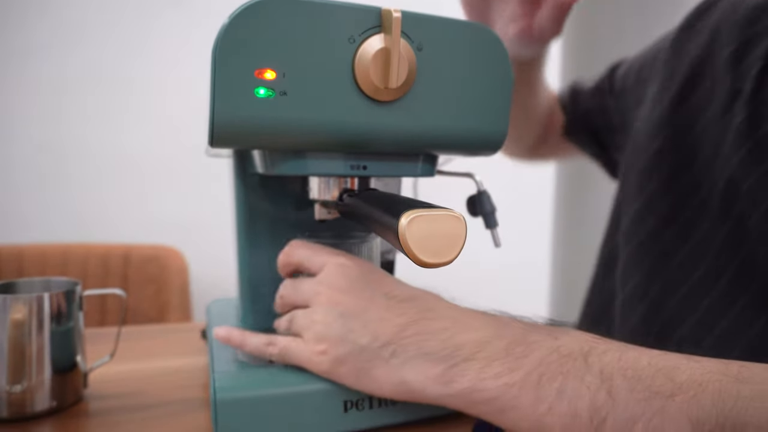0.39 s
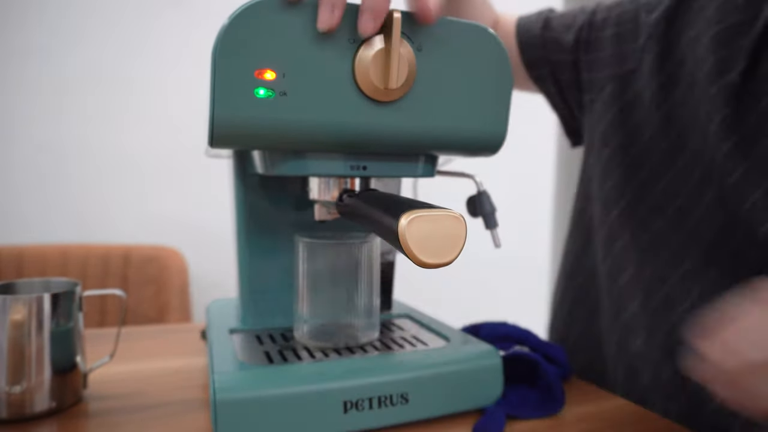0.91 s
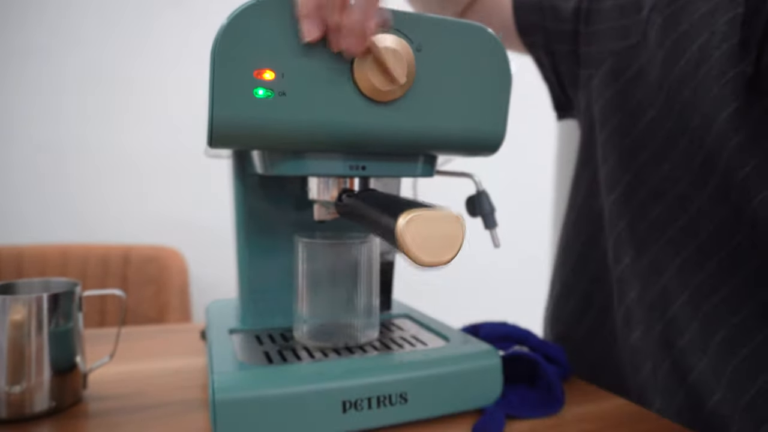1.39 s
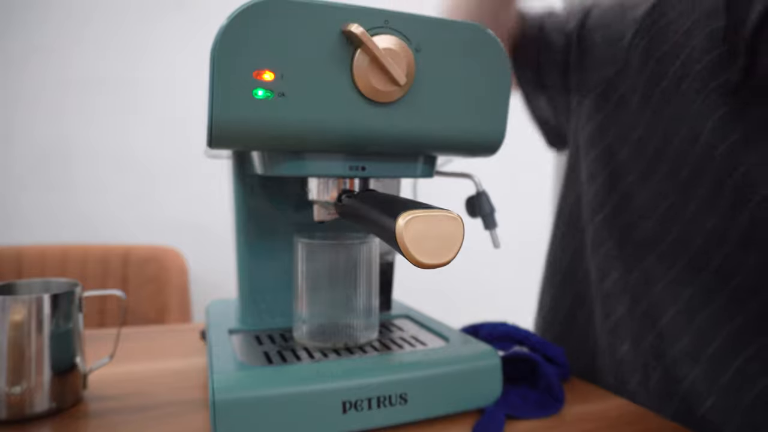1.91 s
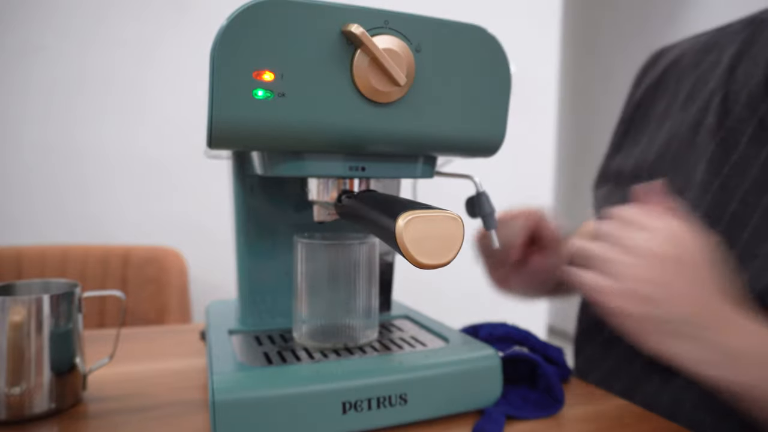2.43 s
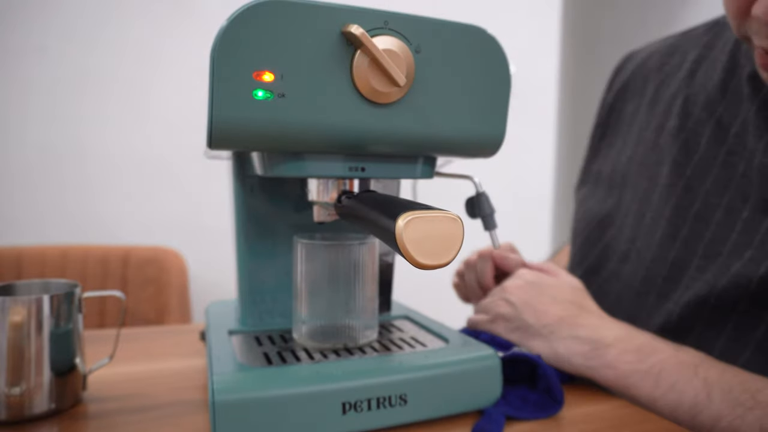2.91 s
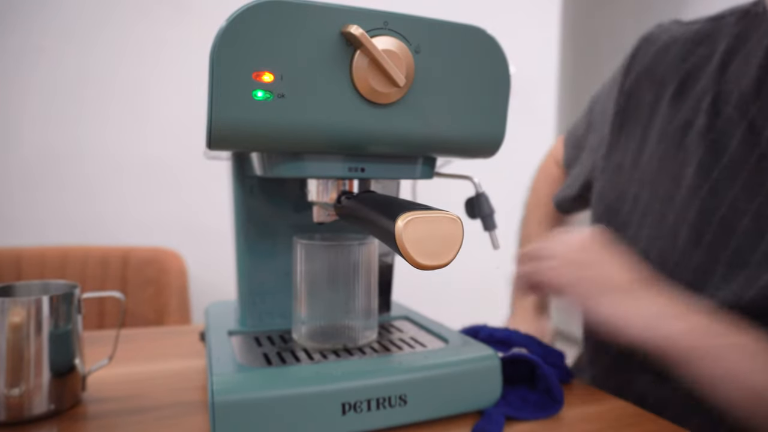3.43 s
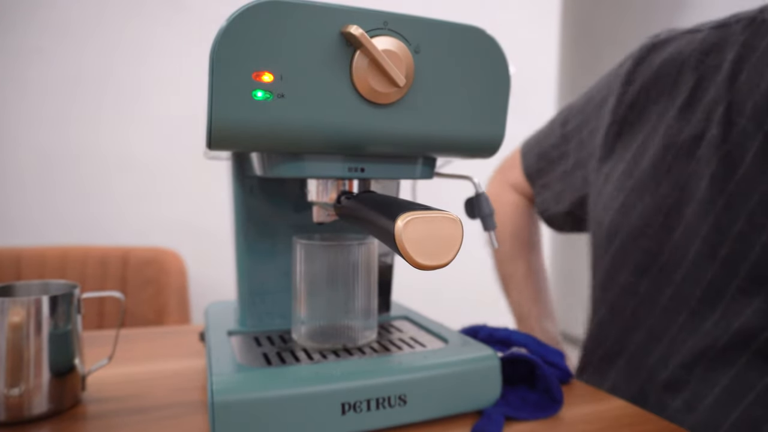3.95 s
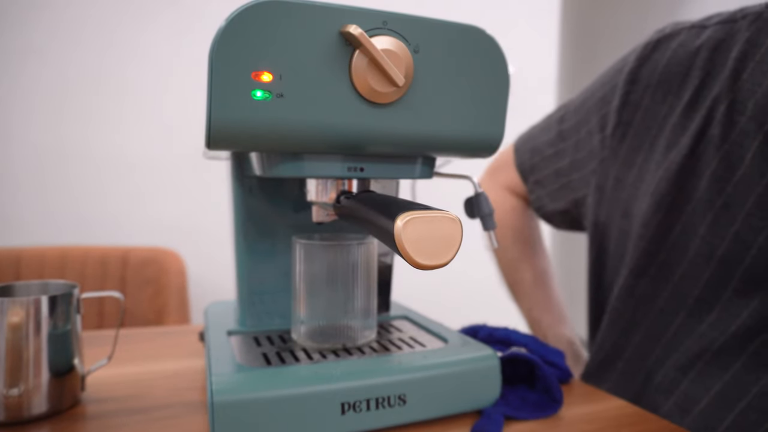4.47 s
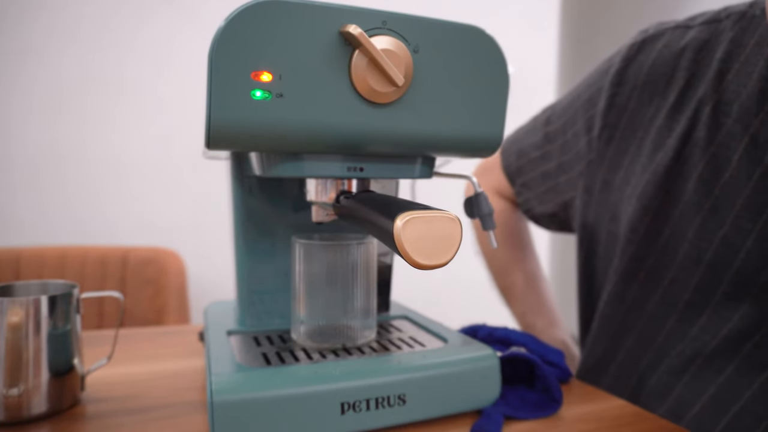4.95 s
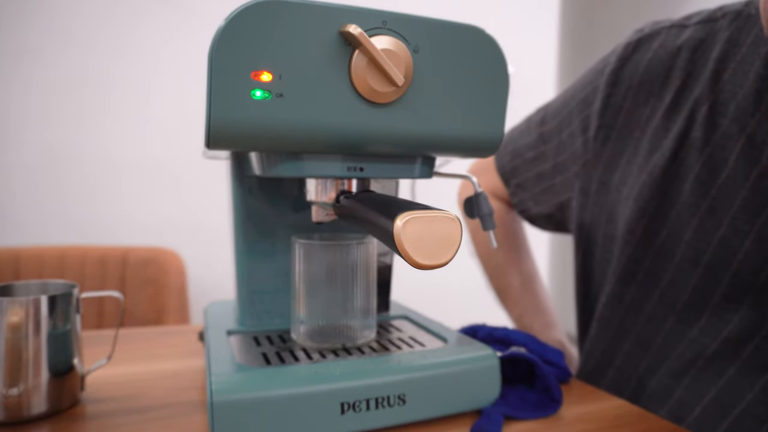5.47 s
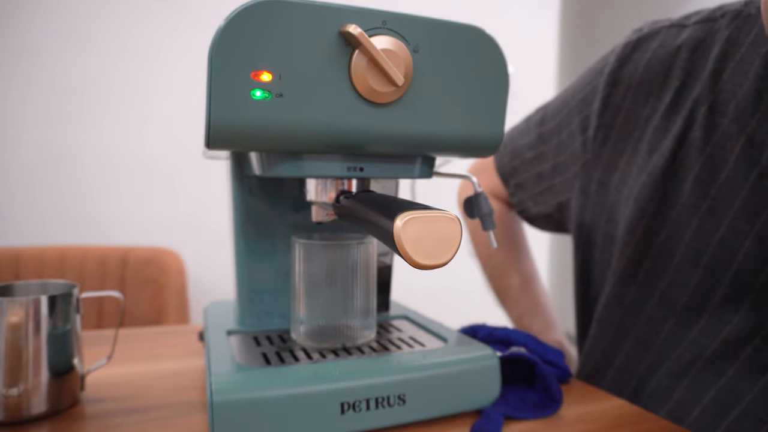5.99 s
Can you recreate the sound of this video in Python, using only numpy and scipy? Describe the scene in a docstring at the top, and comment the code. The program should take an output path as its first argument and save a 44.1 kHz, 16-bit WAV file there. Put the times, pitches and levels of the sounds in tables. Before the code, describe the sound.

Soft room noise, short glassy scrapes and a few knocks open the scene, followed by a near pause and faint rubbing. A heavy, woody switch clunk lands, and a small espresso machine's pump bursts into a coarse, steady buzz. Its casing chatters and sizzles, swelling unevenly, with thin high jingling early on and a raspier edge later. Close microphone, small room with a short dull tail, buzz continuing to the cut.

```python
"""A quiet kitchen, with a small espresso machine on a wooden table that booms under some of the knocks.
A hand slides a glass into place on the drip tray, then snaps the dial round: rubbed noise and struck modes.
Then the mains-driven plunger pump starts: a buzz of partials locked to the mains, a clack on every stroke
and noise for the rattling casing. A loose part jingles as ringing noise bands; two brief squeaks are
rising rough tones. Knocks and rubs carry a dull room tail."""
import sys
import numpy as np
from scipy import signal
from scipy.fft import rfft, irfft
from scipy.io import wavfile
from scipy.ndimage import uniform_filter1d

SR = 44100
rng = np.random.default_rng(int(sys.argv[2]) if len(sys.argv) > 2 else 0)


def store_wav(level_fs):
    """Save 16-bit WAV to argv[1]."""
    pcm = np.round(np.clip(np.atleast_2d(level_fs), -1, 1) * 32767)
    wavfile.write(sys.argv[1], SR, pcm.T.astype(np.int16))


def invert_db(x):
    """Field ratio 10**(x/20) for x, a level in decibels (scalar or array-like)."""
    u = np.asarray(x, float) / 20
    return 10 ** u


N = 269451
TIME = np.arange(N) / SR  # s
MAINS_HZ, FIRST_STROKE_S = 50.027, 1.5006  # one pump stroke per mains cycle


def level(x, db):
    """Scale to an rms level in dB."""
    return x * invert_db(db) / np.sqrt(np.mean(x ** 2))


def colour(x, points):
    """Filter by a (Hz, dB) spectrum, causal through the cepstrum."""
    hz, db = np.transpose(points)
    grid = np.maximum(np.arange(2049) * SR / 4096, 1)
    log_gain = np.interp(np.log(grid), np.log(hz), db) * np.log(10) / 20
    cepstrum = irfft(log_gain)
    # fold the second half onto the first, so that the filter never sounds ahead of its input
    cepstrum[1:2048] *= 2
    cepstrum[2049:] = 0
    return signal.fftconvolve(x, irfft(np.exp(rfft(cepstrum))))[:N]


def band(x, hz, width):
    """One resonance, gain 1 at its centre."""
    return signal.lfilter(*signal.iirpeak(hz, hz / width, SR), x)


def double_band(x, hz, width):
    """The same resonance twice over, for steeper skirts."""
    return band(band(x, hz, width), hz, width)


def walk(rate):
    """Random levels held 1 / rate s and slewed twice; spread near 1."""
    hold = int(SR / rate)
    steps = np.repeat(rng.standard_normal(N // hold + 1), hold)
    return 1.2 * uniform_filter1d(uniform_filter1d(steps, hold), hold)[:N]


def settle(steady, start, settle_s):
    """A value that starts off by `start` at the first stroke and eases to `steady`."""
    return steady + start * np.exp(-np.maximum(TIME - FIRST_STROKE_S, 0) / settle_s)


def swells(table):
    """Bell-shaped rises in dB."""
    return sum(db * np.exp(-((TIME - s) / half_s) ** 2) for s, half_s, db in table)


def spells(table, edge_s):
    """Gain of spells that glide from a start to an end level, with soft edges."""
    gain = 0
    for t0, t1, db0, db1 in table:
        edges = np.clip(np.minimum(TIME - t0, t1 - TIME) / edge_s + .5, 0, 1) ** 2
        gain = gain + invert_db(np.interp(TIME, [t0, t1], [db0, db1])) * edges
    return gain


# Colour of the room noise in the quiet kitchen. Each row: frequency in Hz, relative density in dB per Hz.
AIR_COLOUR = [(44, -33), (75, -4.5), (149, -11.5), (183, -0.5), (209, -6), (348, -8), (389, -4),
              (416, -10.5), (664, -8.5), (811, -10), (1110, -12), (2020, -24.5), (15300, -49.5)]
# The table wobbles far below hearing pitch when leant on.
# Each row: centre in seconds, half length in seconds, rise in dB.
TABLE_NUDGES = [(.27, 0.16, 8.5), (.9, 0.21, 14), (1.36, 0.24, 10), (1.65, 0.15, 22.5), (1.92, 0.057, 16),
                (2.13, .06, 10), (3.72, 0.19, 13), (4.17, 0.13, 19), (4.95, 0.36, 15), (5.6, 0.086, 15)]
AIR_DB, WOBBLE_DB = -41, -38.5  # rms levels, the wobble's between nudges


def kitchen():
    """Soft room noise over a slow wobble of the table, which is noise between 6 and 17 Hz."""
    wobble_band = signal.butter(2, [6, 17], "band", fs=SR, output="sos")
    wobble = signal.sosfilt(wobble_band, rng.standard_normal(N))
    air = colour(rng.standard_normal(N) * invert_db(0.12 * walk(1.63)), AIR_COLOUR)
    return level(air, AIR_DB) + level(wobble, WOBBLE_DB) * invert_db(swells(TABLE_NUDGES))


# Resonances of the glass dragged over the tray. Each row: frequency in Hz, gain in dB.
GLASS_MODES = [(830, 3), (1445, 4), (2350, -1.5), (3000, -2), (4250, -10), (4680, -27.5), (5660, -26)]
# Colour of fingers rubbing the dial. Each row: frequency in Hz, relative density in dB per Hz.
FINGER_COLOUR = [(880, 0.5), (1500, -5), (2020, -20), (2160, -15), (2580, 0.5), (3530, -18.5), (5450, -17),
                 (15800, -27)]
# Spells of the glass over the tray, of fingers on the dial, and of the table murmuring low under the rubbing.
# Each row: start in seconds, end in seconds, gain at the start in dB, gain at the end in dB.
GLASS_SLIDES = [(-.03, 0.22, -47.5, -52), (.23, 0.52, -48, -52.5)]
DIAL_GRIPS = [(1.17, 1.36, -44, -54), (1.41, 1.455, -60, -23.5)]
TABLE_MURMURS = [(1.18, 1.26, -38, -46), (1.28, 1.34, -38, -31), (1.37, 1.45, -40, -27)]
MURMUR_HZ, MURMUR_WIDTH_HZ, RUB_EDGE_S = 253, 34, 0.042


def hands():
    """Uneven rubbing noise: glass scrapes through its resonances, fingertips rub, a table mode murmurs."""
    scrape = rng.standard_normal(N) * invert_db(2.0 * walk(65.9))
    glass = sum(invert_db(db) * double_band(scrape, hz, 0.13 * hz) for hz, db in GLASS_MODES)
    grip = colour(rng.standard_normal(N) * invert_db(2.2 * walk(80.5)), FINGER_COLOUR)
    murmur = double_band(scrape, MURMUR_HZ, MURMUR_WIDTH_HZ)
    return (level(glass, 5.4) * spells(GLASS_SLIDES, RUB_EDGE_S)
            + level(grip, 0) * spells(DIAL_GRIPS, RUB_EDGE_S)
            + level(murmur, 0) * spells(TABLE_MURMURS, RUB_EDGE_S))


def blow(at_s, db, hz, push_cycles, modes, focus_db):
    """A smooth push rings a set of modes, weaker by focus_db per octave from the pitch of the spot struck."""
    out, t = np.zeros(N), np.arange(SR // 2) / SR
    rings = 0
    for k, (mode_hz, mode_db, t60) in enumerate(modes):
        gain = (-1) ** k * invert_db(mode_db - focus_db * abs(np.log2(mode_hz / hz)))
        rings = rings + gain * np.sin(2 * np.pi * mode_hz * t) * np.exp(-np.log(1000) * t / t60)
    push = np.hanning(int(push_cycles * SR / hz) + 3)
    rings = signal.fftconvolve(rings, push)[:len(t)]
    i = int(at_s * SR)
    out[i:i + len(t)] = (invert_db(db) * rings / np.abs(rings).max())[:N - i]
    return out


# Dull thumps through the table. Each row: time in seconds, peak in dB, strongest ring in Hz.
TABLE_THUMPS = [(0.142, -21, 141), (0.184, -27, 64), (.715, -23, 188), (0.746, -18, 64), (0.803, -30, 64),
                (1.462, -7.5, 457), (1.498, -11, 130), (1.513, -6, 310), (1.527, -4, 221), (1.549, -7, 64),
                (1.577, -10, 300), (1.598, -5.5, 337), (1.612, -10, 420), (1.641, -19, 63.6)]
# Rings of the wooden table. Each row: frequency in Hz, strength in dB, 60 dB decay time in seconds.
WOOD_MODES = [(64, 0, .45), (130, -3, .12), (187, -4, .16), (250, -5, .12), (320, -5, .08), (390, -5, .08),
              (500, -7, .06)]
# Knocks on glass and casing. Each row: time in seconds, peak of the ringing in dB,
# treble in dB relative to that, strongest ring in Hz, decay of the scratch in ms.
HARD_KNOCKS = [(.138, -17, -24, 1440, 9.9), (0.146, -22, -30, 1000, 9.2)  , (0.162, -10.5, -37, 1490, 1.3),
               (0.173, -17, -54, 870, 3.2), (.575, -53, -6, 3300, 4.4), (0.711, -20.5, -18, 2300, 3.7),
               (.72, -23, -25, 790, 11), (1.201, -37, -4, 1400, 6.3), (1.4589, -6, 1.5, 2500, 4.9),
               (1.4668, -9, -1.5, 1350, 15), (1.472, -12, -28, 2600, 5.3), (1.483, -10.5, -19, 1050, 12)]
# Rings of glass and casing. Each row: frequency in Hz, strength in dB, 60 dB decay time in seconds.
HARD_MODES = [(250, -4, .06), (380, -4, .05), (700, -4, .035), (900, -4, .03), (1150, -3, .03),
              (1420, -2, .022), (1580, 0, .022), (2000, -3, .018), (2300, -2, .018), (2600, -1, .02),
              (3300, -3, .012), (4300, -5, .012), (5200, -5, .01)]
KNOCK_PUSH, THUMP_PUSH = 0.81, 0.54  # how long the contact lasts, in cycles of the strongest ring


def knocks():
    """Glass, tray and dial: short modes, a bright tick, a scratchy after-chatter, and thumps in the table."""
    out = sum(blow(s, db, hz, THUMP_PUSH, WOOD_MODES, 9.7) for s, db, hz in TABLE_THUMPS)
    since_ms = np.arange(SR // 8) / SR * 1000
    for s, db, treble_db, hz, scratch_ms in HARD_KNOCKS:
        grit = rng.standard_normal(len(since_ms))
        rise = 1 - np.exp(-since_ms / .3)
        scratch = level(double_band(grit, hz, .7 * hz), -6) * np.exp(-since_ms / max(scratch_ms, 1))
        bright = level(band(band(grit, 3400, 4900), 3500, 7300), treble_db)
        tick = bright * (np.exp(-since_ms / 1.4) + 0.09 * np.exp(-since_ms / 30))
        out += blow(s, db, hz, KNOCK_PUSH, HARD_MODES, 12)
        out[int(s * SR):][:len(since_ms)] += invert_db(db) * rise * (scratch + tick)
    return out


# Rising squeaks. Each row: start in seconds, end in seconds, first and last pitch in Hz,
# drive in dB ahead of the rings.
SQUEAK_GLIDES = [(5.232, 5.285, 10600, 15400, -55), (5.255, 5.375, 6200, 15600, -53)]
# The rings they cross. Each row: frequency in Hz, width in Hz, gain in dB.
SQUEAK_RESONANCES = [(7500, 500, 14), (11600, 590, 11.5)]


def squeaks():
    """Thin rough whistles that climb, flaring as they cross two rings."""
    out = np.zeros(N)
    for t0, t1, from_hz, to_hz, db in SQUEAK_GLIDES:
        progress = np.clip((TIME - t0) / (t1 - t0), 0, 1)
        hz = from_hz + (to_hz - from_hz) * progress + 350 * walk(130) + 300 * walk(900)
        gain = invert_db(db + 6.0 * walk(120)) * np.sin(np.pi * progress) ** .6
        out += gain * np.sin(2 * np.pi * np.cumsum(hz) / SR)
    return 0.8 * out + sum(invert_db(db) * band(out, hz, width) for hz, width, db in SQUEAK_RESONANCES)


# Blows inside each pump stroke. Each row: share of the cycle, strength in dB.
STROKE_BLOWS = [(0, 0), (.176, -3), (.363, 0), (.537, -5.5), (.77, -12), (.894, -11)]
# Hum partials against low and against full back pressure.
# Each row: multiple of the mains frequency, relative level in dB.
FREE_PARTIALS = [(1, -10), (2, -8.5), (3, -26.5), (4, -9.5), (5, -1.5), (6, -16.5), (7, -6.5), (8, -20.5),
                 (9, -19), (10, -6), (11, -7), (12, -12), (13, -20), (14, -29), (15, -13.5), (16, -24.5),
                 (17, -6), (18, -20), (19, -18.5), (20, 10), (21, -41), (22, -34), (23, -11), (24, -24)]
LOADED_PARTIALS = [(1, -3.5), (2, -3.5), (3, -2.5), (4, 5), (5, 2.5), (6, 6), (7, -13.5), (8, -2),
                   (9, -17.5), (10, -17), (11, -13.5), (12, -18.5), (13, -15.5), (14, -8.5), (15, -13),
                   (16, -6), (17, -9.5), (18, -14.5), (19, -15), (20, -48), (21, -46), (22, -38), (23, -17),
                   (24, -22.5)]
LOAD, LOAD_START, LOAD_SETTLE_S = 0.79, -0.14, 3.6  # back pressure 0-1, offset at the start, s


def pump_hum(cycles):
    """Mains-locked partials whose balance follows the back pressure."""
    share, blow_db = np.transpose(STROKE_BLOWS)
    load = np.clip(settle(LOAD, LOAD_START, LOAD_SETTLE_S), 0, 1)
    hum = 0
    for (k, free_db), (_, loaded_db) in zip(FREE_PARTIALS, LOADED_PARTIALS):
        # each blow is a sudden pressure drop; together they set the timing of every partial
        lag = np.angle(np.sum(invert_db(blow_db) * np.exp(-2j * np.pi * k * share)))
        waver_db = (0.15 + 0.018 * k) * walk(9)
        drift = .012 * k * walk(12)  # radians
        gain = invert_db(free_db + load * (loaded_db - free_db) + waver_db)
        hum = hum - gain * np.sin(2 * np.pi * k * cycles + lag + drift)
    return hum


# How hard each blow of the stroke shakes the treble. Each entry: strength in dB.
BLOW_TREBLE = [4, -8, 2.5, 0.5, 1, -2.5]


def pump_blows(cycles):
    """Impulses, jittered in time and strength: every blow, and the main blow of each stroke alone."""
    share, _ = np.transpose(STROKE_BLOWS)
    strokes = np.arange(int(cycles[-1]))
    chance = rng.standard_normal((len(strokes), len(share), 2))
    at_s = FIRST_STROKE_S + (strokes[:, None] + share) / MAINS_HZ + 1.5e-5 * chance[..., 0]
    at = (at_s * SR).astype(int)
    clicks, main = np.zeros(N + SR), np.zeros(N + SR)
    np.add.at(clicks, at, -invert_db(np.array(BLOW_TREBLE) + 1.8 * chance[..., 1]))
    np.add.at(main, at[:, 0], invert_db(1.9 * chance[:, 0, 1]))
    return clicks[:N], main


def casing_echoes(main):
    """The main blow sets off the same tangle of echoes inside the casing every stroke."""
    tangle = rng.standard_normal(SR // 20) * np.exp(-np.arange(SR // 20) / (0.0093 * SR))
    # keeping only the phase smears the blow in time without colouring it
    tangle = irfft(np.exp(1j * np.angle(rfft(tangle))))
    return signal.fftconvolve(main, tangle)[:N]


# Colour of the casing rattle. Each row: frequency in Hz, relative density in dB per Hz.
CASING_COLOUR = [(71, -27), (120, -21), (150, -27.5), (194, -8), (301, -8), (346, -5), (402, -1.5),
                 (624, -8), (833, -4.5), (1070, -9), (1950, -16), (3200, -34.5), (4160, -121), (7040, -120)]
# Colour of the plunger clack. Each row: frequency in Hz, relative density in dB per Hz.
CLACK_COLOUR = [(740, -32), (1250, 4.5), (2030, -4.5), (2270, -4), (2430, -3), (2760, -13.5), (3580, -11),
                (6100, -24.5), (7000, -28.5), (9100, -33), (15400, -120)]
# Colour of the metal-on-metal treble. Each row: frequency in Hz, relative density in dB per Hz.
SIZZLE_COLOUR = [(1650, -18), (2800, 3.5), (3140, -3), (3640, -1.5), (4200, -3), (5230, -12), (5660, -9.5),
                 (6290, -15.5), (6620, -24.5), (8190, -20), (8850, -27.5), (10800, -29.5), (12300, -39),
                 (15300, -36)]


def casing_rattle(clicks, flare, noise):
    """Casing noise, ticks and metallic sizzle that flare around each blow."""
    high_pass = signal.butter(2, 7000, "high", fs=SR, output="sos")
    top = signal.sosfilt(high_pass, noise)
    # the treble follows the blows closely; lower down the casing rings on between them
    upper = noise * (0.12 + flare) + 0.59 * top * flare ** 2
    casing = level(colour(rng.standard_normal(N) * (8.1 + flare), CASING_COLOUR), 4.18)
    ticks = level(colour(clicks, CLACK_COLOUR), -12)
    return casing + ticks + level(colour(upper, SIZZLE_COLOUR), -11)


# Casing rings that set in as the puck tightens. Each row: frequency in Hz, width in Hz, gain in dB.
RASP_RINGS = [(1926, 290, 2), (2350, 220, 0.5), (3630, 230, -6)]
RASP_S, RASP_RISE_S, RASP_DB = 4.85, .05, -36  # middle of the onset, its time constant, final gain


def casing_rasp(echoed, noise):
    """Echoed blows and noise ring a few casing modes after a smooth onset."""
    gain = invert_db(RASP_DB) / (1 + np.exp((RASP_S - TIME) / RASP_RISE_S))
    shake = level(echoed, 0) + 0.48 * noise
    rings = sum(invert_db(db) * double_band(shake, hz, width) for hz, width, db in RASP_RINGS)
    return gain * level(rings, 0)


# Thin metal ticked once a stroke. Each row: frequency in Hz, width in Hz, rms level in dB.
THIN_RINGS = [(8000, 1500, -64.5), (10430, 800, -69.5), (13450, 700, -73)]


def thin_metal(main, noise):
    """A short noise burst per stroke rings thin metal."""
    tick = noise * signal.fftconvolve(main, np.hanning(int(0.0034 * SR)))[:N]
    return sum(level(double_band(tick, hz, width), db) for hz, width, db in THIN_RINGS)


# Rings of the jingling loose part. Each row: frequency in Hz, width in Hz, relative gain in dB.
JINGLE_RINGS = [(8260, 500, -2), (9240, 300, 0), (9650, 300, -1), (11600, 350, -6), (12400, 350, -2),
                (12900, 300, -8)]
# Spells of jingling. Each row: start in seconds, end in seconds, gain at the start and at the end in dB.
JINGLE_SPELLS = [(1.63, 1.83, -62, -52), (1.9, 2.06, -68.5, -59), (2.07, 3.2, -54, -58),
                 (3.2, 3.53, -59, -69), (3.33, 3.352, -55, -52), (3.405, 3.425, -54, -60)]


def loose_part(flare, noise):
    """Noise shaken by the blows rings high narrow modes, each wavering in level."""
    shaken = noise * (.12 + flare)
    jingle = 0
    for hz, width, db in JINGLE_RINGS:
        gain = invert_db(db + 2 * walk(30) + 2.5 * walk(2.5))
        jingle = jingle + gain * double_band(shaken, hz, width)
    return level(jingle, 3.0) * spells(JINGLE_SPELLS, 0.019)


# The casing shudders and rattles louder for a moment.
# Each row: centre in seconds, half length in seconds, rise of the rattle in dB.
CASING_SHUDDERS = [(1.525, 0.017, 9.5), (1.61, .04, 5.5), (1.76, 0.12, 2), (2.3, 0.02, 3),
                   (2.6, 0.021, 4.5), (2.92, 0.15, 2.5), (3.3, 0.3, 3), (3.6, 0.032, 2.5), (4.2, 0.15, 4),
                   (4.41, 0.051, 4.5), (4.57, 0.054, 6), (4.97, 0.043, 4), (5.23, 0.0155, 2),
                   (5.68, 0.0375, 5.5), (5.96, 0.053, 3)]
# the pump settles after switch-on: steady gain in dB, offset at the start in dB, settling time in s
HUM_DB, HUM_START_DB, HUM_SETTLE_S = -17.5, -5.5, 0.45
RATTLE_DB, RATTLE_START_DB, RATTLE_SETTLE_S = -28.5, -3, 1.28


def pump():
    """Steady partials of the stroke, a jittered clack per stroke, and rattle that flares around each blow."""
    cycles = (TIME - FIRST_STROKE_S) * MAINS_HZ
    clicks, main = pump_blows(cycles)
    echoed = casing_echoes(main)
    flare = signal.fftconvolve(np.abs(clicks), np.hanning(int(0.0066 * SR)), "same")
    noise = rng.standard_normal(N)
    stroke = level(pump_hum(cycles), 2.38) + level(colour(echoed, CLACK_COLOUR), -15.0)
    shudder_db = swells(CASING_SHUDDERS)
    stroke_gain = invert_db(settle(HUM_DB, HUM_START_DB, HUM_SETTLE_S) + 0.076 * shudder_db)
    rattle_db = settle(RATTLE_DB, RATTLE_START_DB, RATTLE_SETTLE_S)
    rattle_gain = invert_db(rattle_db + shudder_db + 1.7 * walk(20))
    running = stroke * stroke_gain + rattle_gain * casing_rattle(clicks, flare, noise)
    running = running + casing_rasp(echoed, noise) + thin_metal(main, noise)
    return running * (cycles > 0) + loose_part(flare, noise)


ROOM_T60_S, ROOM_DB = 0.58, -12  # decay time, level of the tail against the direct sound


def scene():
    """Knocks and scrapes get the room's dull tail; the steady buzz already fills it."""
    t = np.arange(SR // 2) / SR
    tail = rng.standard_normal(len(t)) * np.exp(-np.log(1000) * t / ROOM_T60_S) * (t > .006)
    tail = signal.lfilter([1], [1, -.2], tail)  # slightly dulled
    tail = invert_db(ROOM_DB) * tail / np.sqrt(np.sum(tail ** 2))
    near = knocks() + hands()
    room = signal.fftconvolve(near, tail)[:N]
    return (near + room + pump() + squeaks() + kitchen())[None]


def band_limit(x):
    """A steep low-pass at the top of the band."""
    return signal.sosfilt(signal.butter(12, 16400, fs=SR, output="sos"), x)


def record(dry):
    """The mix is clipped at full scale and low-passed at 15830 Hz."""
    low_pass = signal.ellip(10, .2, 60, 15830, fs=SR, output="sos")
    heard = signal.sosfilt(low_pass, np.clip(dry, -1, 1))
    return band_limit(heard)


dry = scene()
out = record(dry)
store_wav(out)
```